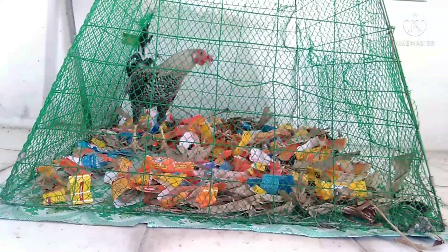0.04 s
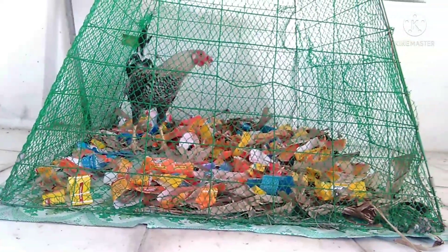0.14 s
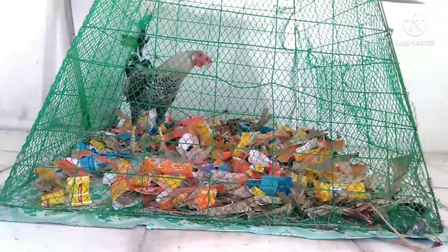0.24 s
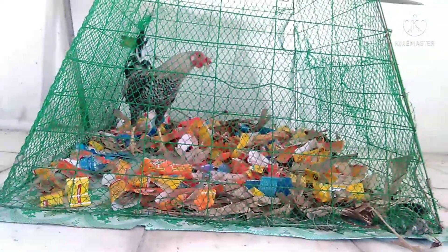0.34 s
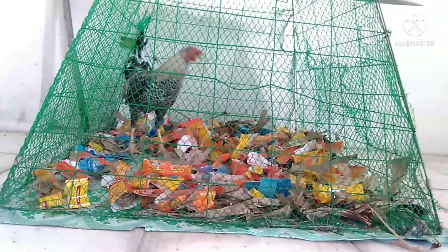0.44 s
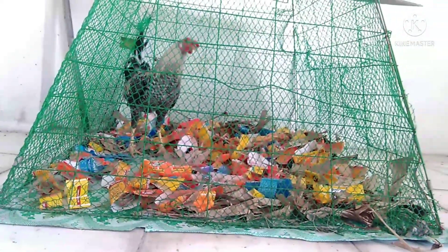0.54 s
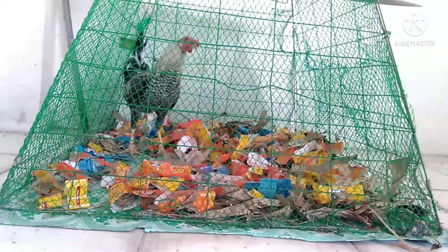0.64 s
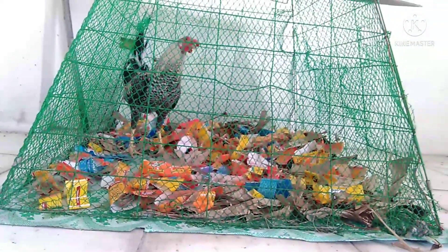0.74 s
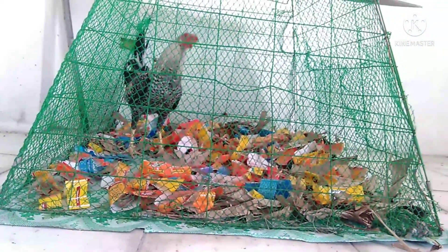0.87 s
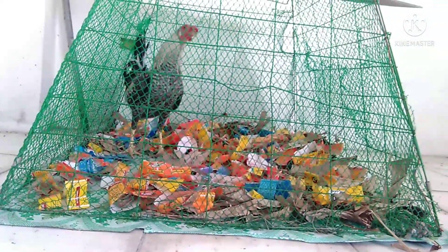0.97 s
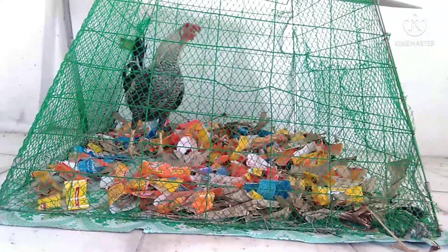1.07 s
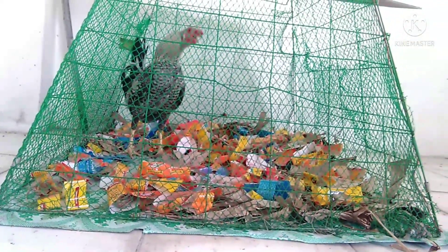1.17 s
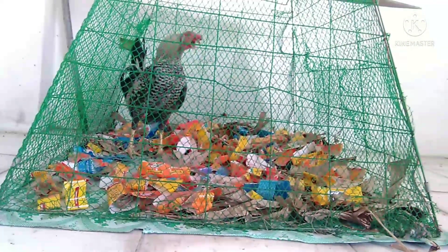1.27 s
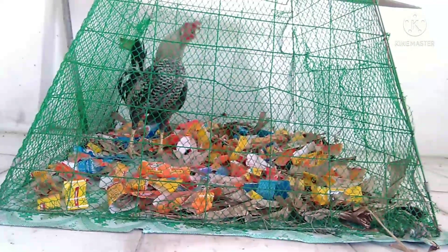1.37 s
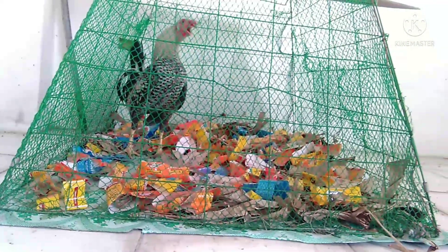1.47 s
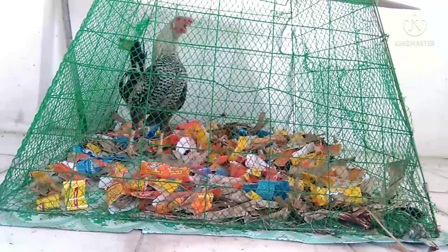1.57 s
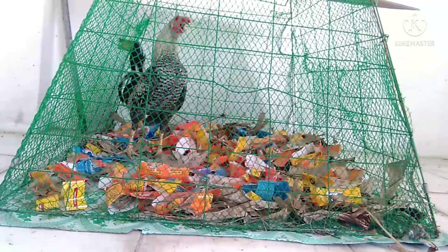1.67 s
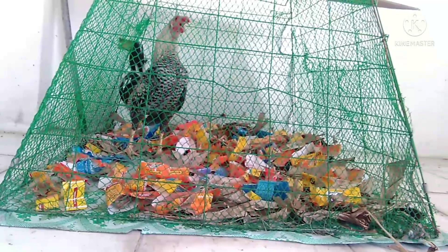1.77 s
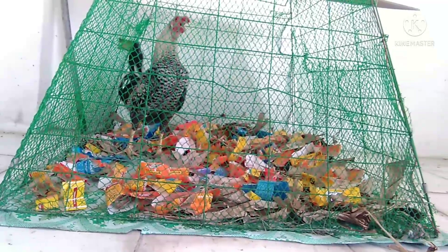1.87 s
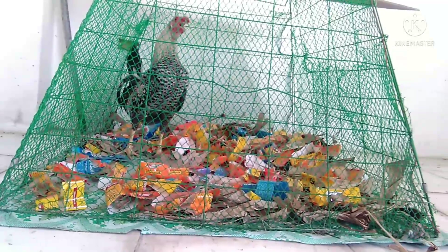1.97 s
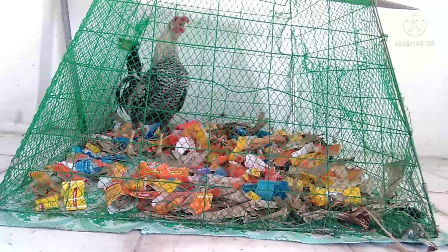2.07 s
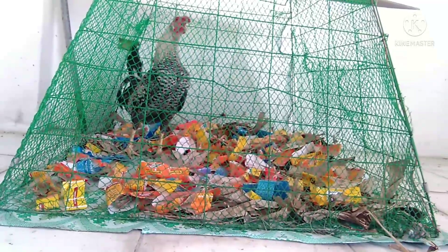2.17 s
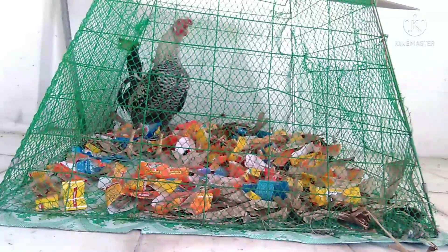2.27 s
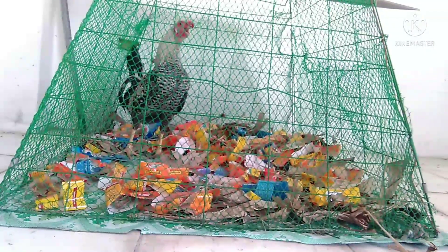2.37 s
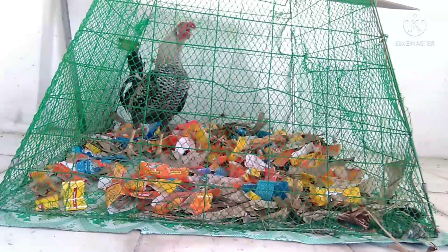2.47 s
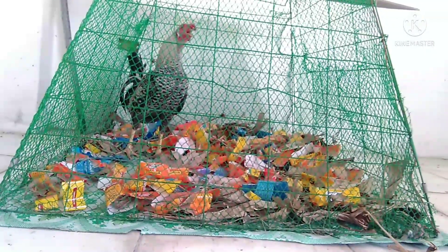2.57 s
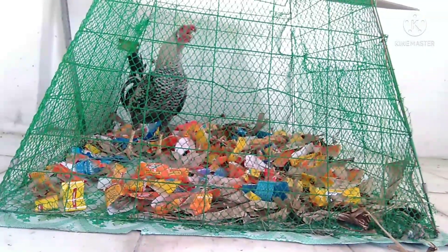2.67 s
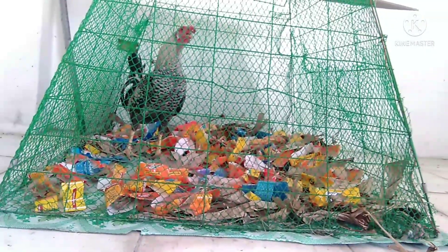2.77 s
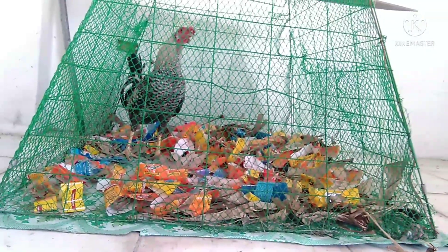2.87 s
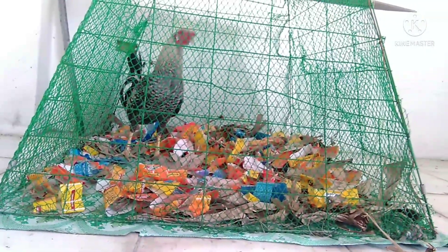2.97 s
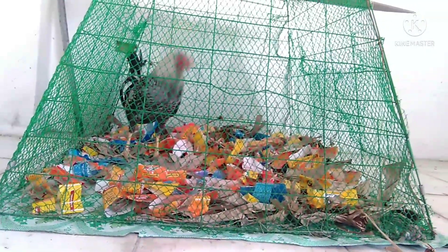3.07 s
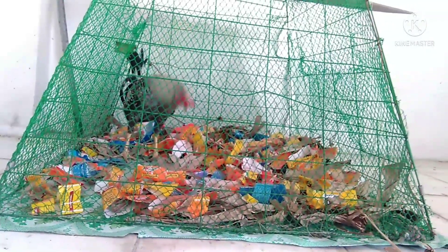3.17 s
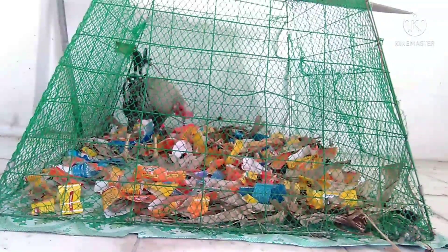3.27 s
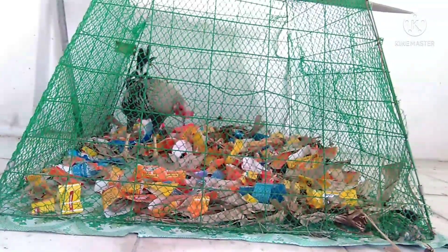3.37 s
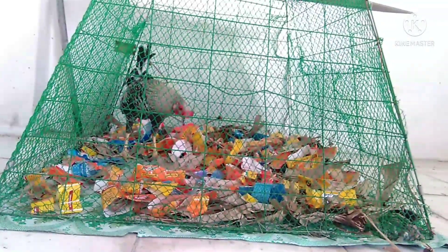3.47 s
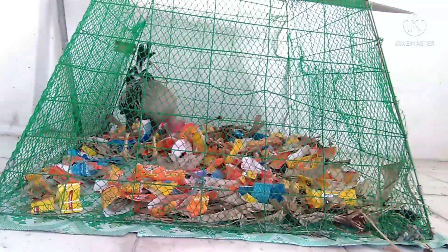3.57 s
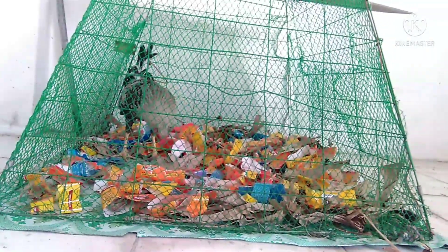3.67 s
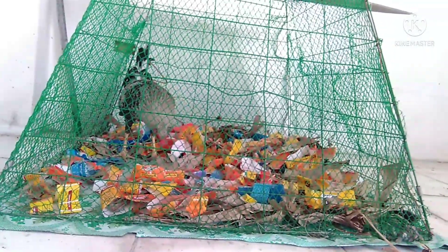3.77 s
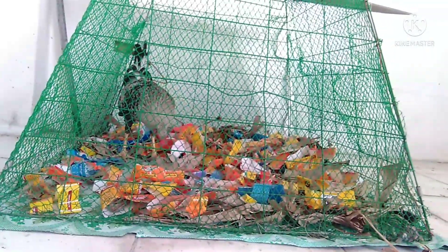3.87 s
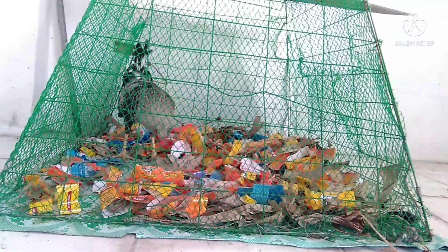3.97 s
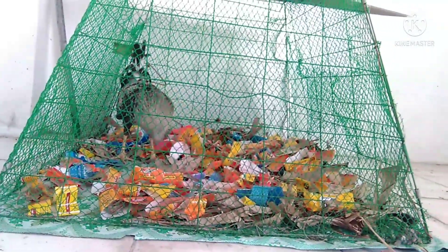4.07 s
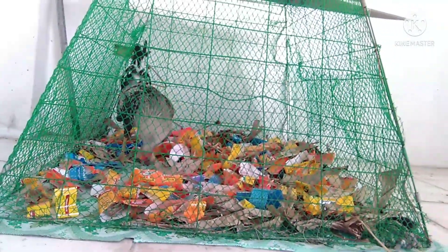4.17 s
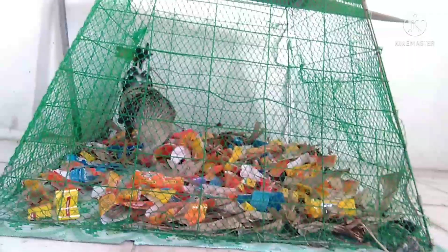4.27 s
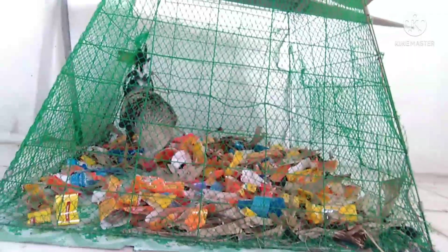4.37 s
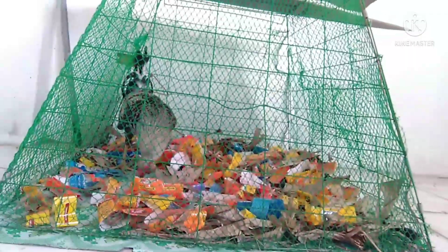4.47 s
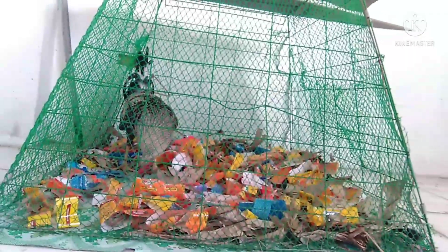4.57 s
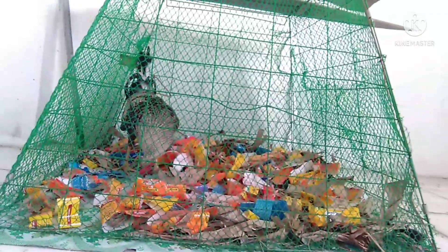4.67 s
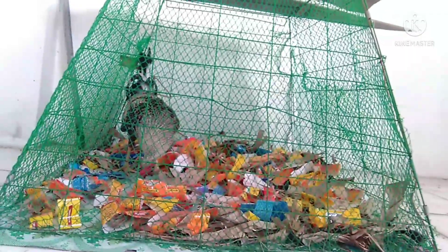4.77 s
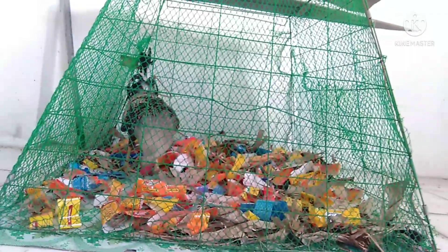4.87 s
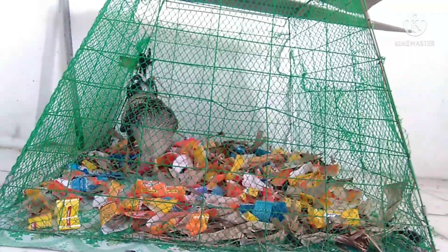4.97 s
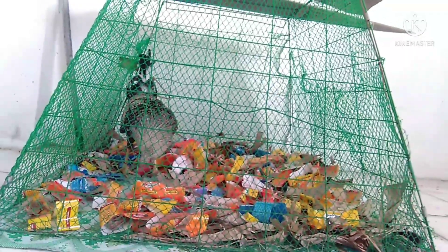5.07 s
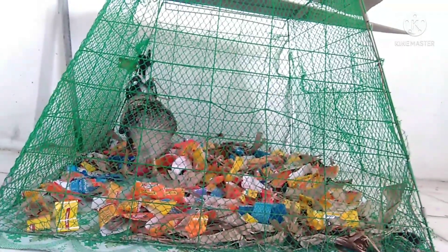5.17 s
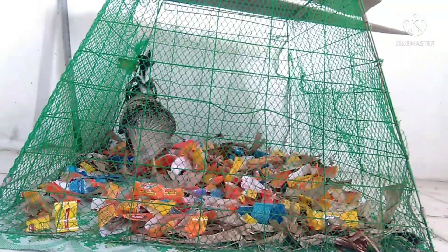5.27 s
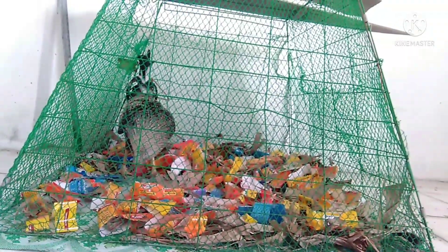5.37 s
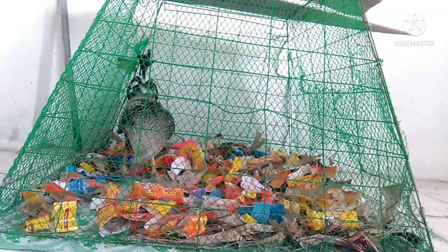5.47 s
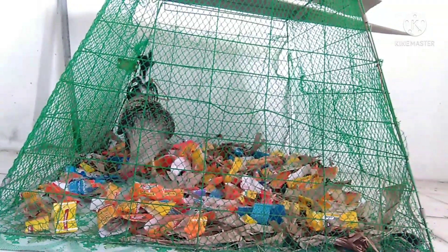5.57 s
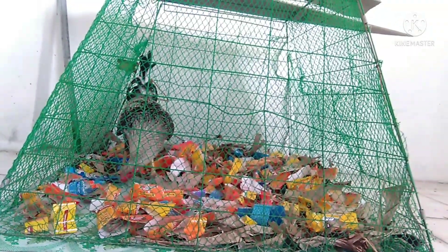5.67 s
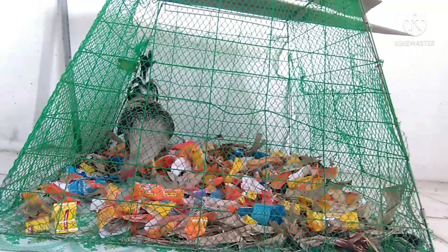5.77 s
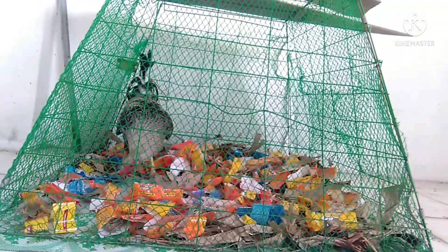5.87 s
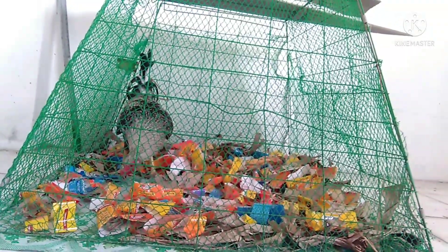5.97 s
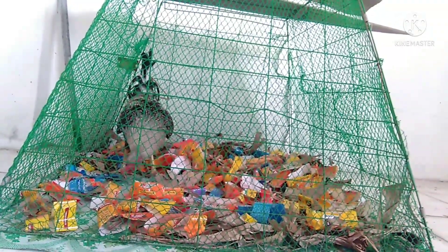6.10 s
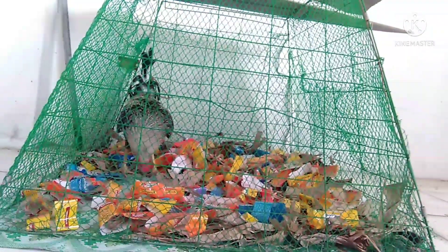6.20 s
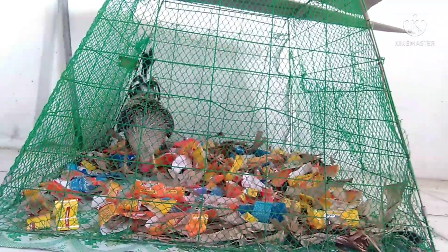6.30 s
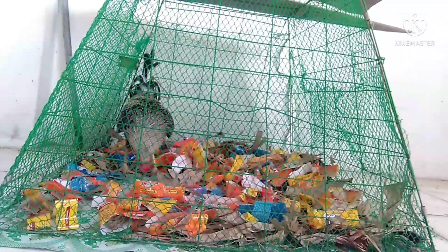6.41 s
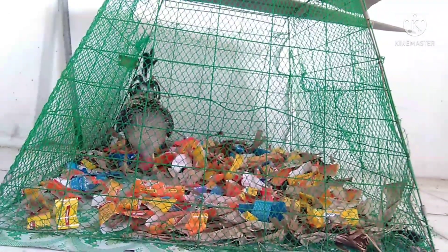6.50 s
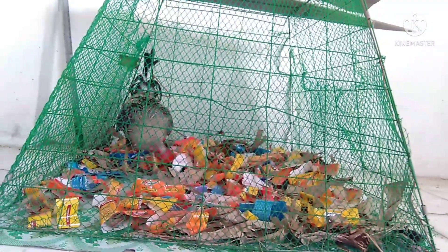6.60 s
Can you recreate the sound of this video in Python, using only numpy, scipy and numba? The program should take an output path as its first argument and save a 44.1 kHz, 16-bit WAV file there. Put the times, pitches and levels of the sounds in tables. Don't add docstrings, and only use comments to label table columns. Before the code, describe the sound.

One close rooster crow, rough then clear and finally mellow, echoes in a hard-walled yard over steady fan hum, with small plastic snaps afterward.

```python
import sys
import numpy as np
from scipy import signal
from scipy.fft import rfft, irfft
from scipy.io import wavfile
from scipy.ndimage import uniform_filter1d, minimum_filter1d
from numba import njit

SR = 44100
rng = np.random.default_rng(int(sys.argv[2]) if len(sys.argv) > 2 else 0)


def gain_from_decibels(decibels):
    exponent = np.asarray(decibels, float) / 20
    return 10 ** exponent


def transcribe(u):
    v = np.clip(np.atleast_2d(u).T, -1, 1)
    q = np.round(v * 32767).astype(np.int16)
    wavfile.write(sys.argv[1], SR, q)


N = 292912


def on_log(table, hz):
    f, v = np.transpose(table)
    return np.interp(np.log(np.maximum(hz, 1)), np.log(f), v)


def unit(x):
    return x / np.sqrt(np.mean(x ** 2))


def colour(x, table):
    hz = np.fft.rfftfreq(x.shape[-1], 1 / SR)
    shut = [(table[0][0] / 1.2, -90)] + list(table) + [(table[-1][0] * 1.2, -90)]
    return irfft(rfft(x) * gain_from_decibels(on_log(shut, hz)), x.shape[-1])


def walk(rate):
    k = int(SR / rate)
    return unit(uniform_filter1d(uniform_filter1d(rng.standard_normal(N), k), k))


@njit
def follow(x, attack, release):
    e, out = 0., np.empty(len(x))
    for i in range(len(x)):
        e += (x[i] - e) * (attack if x[i] > e else release)
        out[i] = e
    return out


def drone(table, db, alike, flicker_db):
    port_lag = 16
    near, other = unit(colour(rng.standard_normal((2, N)), table))
    left = alike * np.roll(near, port_lag) + np.sqrt(1 - alike ** 2) * other
    return np.array([left, near]) * gain_from_decibels(db + flicker_db * walk(4.9))


def hum(air_db):
    # frequency in Hz, level in dB per Hz.
    hum_spectrum = [(15, -63), (25, -55), (32, -46), (47, -22.5), (85, -6), (129, -1), (148, -3),
                    (225, -14), (256, -10), (288, -18), (320, -13), (420, -27), (700, -120)]
    return drone(hum_spectrum, -37 + air_db, 1.0, 1.0)


def flow(air_db, treble_db):
    # frequency in Hz, level in dB per Hz.
    flow_spectrum = [(180, -46), (300, -29), (333, 1), (437, -4.5), (479, -3.5), (611, -3.5), (662, -0.5),
                     (884, -6.5), (1120, -4), (1260, -7.5), (1450, -9.5), (1880, -37), (3190, -120)]
    return drone(flow_spectrum, -42 + 0.42 * air_db + 0.12 * treble_db, 0.6, 1.0)


def rush(air_db, treble_db):
    # frequency in Hz, level in dB per Hz.
    rush_spectrum = [(820, 1), (1400, 2), (1570, 2), (2400, 3), (2630, -2.5), (3130, -10.5), (3600, -21),
                     (4680, -11), (7920, -120)]
    return drone(rush_spectrum, -48 + air_db + 0.46 * treble_db, 0.093, 1.0)


def duct(air_db, treble_db):
    # frequency in Hz, bandwidth in Hz, level in dB.
    modes = [
        (1111, 80, 1.5),
        (2370, 120, -8),
        (3210, 150, -11),
    ]
    t = np.arange(N) / SR
    out = 0
    for hz, width, peak_db in modes:
        k = max(int(SR / width / 2), 1)
        noise = rng.standard_normal((2, 2, N))
        slow = unit(uniform_filter1d(uniform_filter1d(noise, k), k))
        phase = 2 * np.pi * np.cumsum(hz * (1 + 0.015 * walk(1.2))) / SR
        band = slow[0] * np.cos(phase) + slow[1] * np.sin(phase)
        out = out + band * gain_from_decibels(peak_db + 1.2 * walk(4.5))
    return out * gain_from_decibels(-53.5 + 1.53 * air_db + 0.46 * treble_db)


def hiss(treble_db):
    # frequency in Hz, level in dB per Hz.
    hiss_spectrum = [(2060, -2), (3500, 1), (3930, -4.5), (4700, -6.5), (5340, -8.5), (7970, -10),
                     (9110, -9.5), (12700, -22.5), (14000, -25)]
    return drone(hiss_spectrum, -51 + treble_db, 0.066, 0.61)


def ventilation():
    # time in seconds, background level in dB, treble let through by the phone in
    # dB.
    air = [(0, -2, 1.5), (.33, -0.5, -5), (.45, 0, -17), (.83, -2, -14), (1.0, -1.5, -7.5),
           (1.36, -1, -5.5), (2.9, -0.5, 3), (3.4, 2, 2), (3.8, -0.5, 3.5), (4.2, 2, 4.5), (4.6, 3.5, 4.5),
           (5.0, 2.5, 6), (5.3, 4, 5.5), (5.7, 3.5, 6), (5.95, 5, 7.5), (6.25, 3, 6.5), (6.64, 3.5, 8.5)]
    t = np.arange(N) / SR
    s, *columns = np.transpose(air)
    air_db, treble_db = (np.interp(t, s, c) for c in columns)
    low = hum(air_db) + flow(air_db, treble_db)
    high = rush(air_db, treble_db) + hiss(treble_db)
    return low + high + duct(air_db, treble_db)


def phrase(t):
    # start in seconds, pitch at start in Hz,
    # pitch at end in Hz, effort in dB, first partial in dB.
    notes_sung = [(1.39, 984.4, 974.4, -11.5, -7.5), (1.492, 875.8, 840.4, -12, -9.5),
                  (1.55, 674, 694.8, -13.5, -30), (1.58, 777, 771, -25.5, 2),
                  (1.645, 867.7, 863, -26.5, 3.5), (1.698, 913.3, 992.9, -13.5, -5.5),
                  (1.738, 1004, 1049, -18, 6.5), (1.766, 1053, 1050, -24, 13),
                  (1.823, 934.3, 933, -13.5, 3.5), (1.843, 698, 645, -17, -22),
                  (1.892, 647.8, 733, -14, -17.5), (1.928, 905.5, 984.5, -13, -2),
                  (2.02, 936, 1000, -14.5, 0), (2.08, 987, 1014, -15.5, 7.5), (2.14, 934.7, 907, -14, -3.5),
                  (2.3, 906.5, 892.4, -12, 2), (2.425, 669.3, 653.7, -16.5, -18),
                  (2.511, 657, 662.7, -7.5, -22), (2.56, 667, 741, -9.5, -12),
                  (2.602, 838.7, 836.2, -8, -20), (2.699, 843.6, 827.6, -7.5, -15),
                  (2.8, 824.5, 813.6, -12, -13), (2.86, 813.4, 783.7, -16.5, 4),
                  (2.914, 785.7, 723, -25.5, 15)]
    crow_end_s, attack_s, release_s = 2.965, 0.01, 0.019
    slur_samples = int(0.0027 * SR) + 1
    start, hz0, hz1, db, first_db = np.transpose(notes_sung)
    end = np.append(start[1:], crow_end_s)
    k = np.clip(np.searchsorted(start, t) - 1, 0, None)
    progress = np.clip((t - start[k]) / (end - start)[k], 0, 1)
    hz = hz0[k] + (hz1 - hz0)[k] * progress
    edge = np.clip(np.minimum((t - start[0]) / attack_s, (crow_end_s - t) / release_s), 0, 1)
    effort_db = uniform_filter1d(db[k], slur_samples) - 9 * (1 - edge)
    first_db = uniform_filter1d(first_db[k], slur_samples)
    return hz, effort_db, first_db, (t > start[0]) & (t < crow_end_s)


def crack(t, hz, first_db):
    # middle in seconds, length in seconds.
    cracks = [
        (2.006, .018),
        (2.056, .012),
        (2.112, .016),
        (2.15, .012),
        (2.204, .012),
        (2.238, .018),
        (2.322, .016),
        (2.362, .01),
    ]
    drop_ratio, rebound, rebound_s = 0.76, 0.037, 0.023
    for start, length in cracks:
        after = t - start - length / 2
        first_db = first_db - 25.5 * (abs(t - start) < length)
        sharp = 1 + (after > 0) * rebound * np.exp(-abs(after) / rebound_s)
        hz = hz * np.where(abs(t - start) < length / 2, drop_ratio, sharp)
    return hz, first_db


def membrane(turns, first_db, bright_db, rough, beat):
    voice = 0
    for k in range(1, 20):
        steady = 1 if k < 5 else np.clip(1 - 4 * rough, .25, 1)
        partial_db = first_db if k == 1 else bright_db * (k > 2) - 7 * (k == 3)
        voice = voice + steady * gain_from_decibels(partial_db) * np.cos(2 * np.pi * k * turns + 0.28 * k ** 2)
    fourth = np.minimum(3 * rough, 1) * np.cos(np.pi * turns / 2)
    pattern = fourth + 1.16 * np.cos(np.pi * turns)
    voice = voice * (1 + 0.58 * beat * pattern)
    return voice * gain_from_decibels(5 * rough * walk(300))


def rasping_air(turns, bright_db, rough):
    # frequency in Hz, level in dB per Hz.
    rasp_spectrum = [(700, -20.5), (1500, -15), (3000, -7.5), (6000, -14.5), (14000, -4.5)]
    gate = np.exp(-(turns % 1) / 0.4)
    rasp = unit(colour(gate * rng.standard_normal(N), rasp_spectrum))
    return rasp * (0.0061 + rough) * gain_from_decibels(16.5 + bright_db)


def throat(source, t):
    # frequency in Hz, gain in dB.
    bent = [(300, -38), (750, 5), (1000, 0.5), (1200, -9), (1750, 7), (2000, -5), (2400, -14),
            (3300, -25.5), (3850, -36.5), (4450, -17), (5800, -7), (7200, -18), (9000, -23), (14000, -31)]
    # frequency in Hz, gain in dB.
    straight = [(300, -11), (700, 3.5), (1400, -4), (1900, 7.5), (2500, -11), (3650, -9), (4080, -27),
                (4500, -18), (5800, -10), (6500, -13), (7500, -13), (8600, -18), (10300, -21), (14000, -32)]
    stretch_s = 1.70
    stretched = np.clip((t - stretch_s) / .02 + .5, 0, 1)
    return colour(source * (1 - stretched), bent) + colour(source * stretched, straight)


def rooster():
    # time in seconds, brightness in dB, roughness from 0 to 1,
    # subharmonic beat from 0 to 1.
    voice_course = [
        (1.388, 4, .33, .95),
        (1.639, 3, 0.33, 0.53),
        (1.758, 8, .17, .1),
        (1.9, 4, .1, .03),
        (2.132, 5.5, .14, .08),
        (2.4, 6.5, 0.18, 0.05),
        (2.55, -12.5, 0.07, 0.11),
        (2.86, -5.5, 0, 0.01),
        (2.929, -5.5, 0.16, 0),
    ]
    t = np.arange(N) / SR
    hz, effort_db, first_db, sounding = phrase(t)
    s, *columns = np.transpose(voice_course)
    bright_db, rough, beat = (np.interp(t, s, c) for c in columns)
    hz, first_db = crack(t, hz, first_db)
    shake = .02 * walk(500) + .025 * walk(60)
    turns = np.cumsum(uniform_filter1d(hz, 90) * (1 + rough * shake)) / SR
    voice = membrane(turns, first_db, bright_db, rough, beat)
    source = voice + rasping_air(turns, bright_db, rough)
    return throat(source * gain_from_decibels(effort_db) * sounding, t)


def yard():
    # frequency in Hz, time to fall 60 dB in seconds.
    t60 = [(600, 1.58), (1000, 1.62), (2000, 1.26), (4000, 1.19), (8000, 0.92), (14000, 1.1)]
    build_s, level_db = 0.0051, 6.5
    size = 2 * SR
    t = np.arange(size) / SR
    hz = np.fft.rfftfreq(size, 1 / SR)
    noise = rfft(rng.standard_normal((2, size)))
    tail = 0
    for centre in 350 * 2 ** np.arange(0, 5.6, .5):
        share = np.clip(1 - 2 * abs(np.log2(np.maximum(hz, 1) / centre)), 0, 1)
        tail = tail + irfft(noise * share, size) * gain_from_decibels(-60 * t / on_log(t60, centre))
    tail = tail * (1 - np.exp(-(t / build_s) ** 2))
    return tail * gain_from_decibels(level_db) / np.sqrt(np.mean(np.sum(tail ** 2, axis=1)) * 3)


def crow():
    pan_db, lag = 7, 4
    bird = rooster()
    direct = np.array([bird * gain_from_decibels(pan_db / 2), np.roll(bird, lag) * gain_from_decibels(-pan_db / 2)])
    echoes = signal.fftconvolve(bird[None], yard(), axes=1)[:, :N]
    return direct + echoes


def litter():
    # time in seconds, peak in dB.
    ticks = [
        (3.4131, -33),
        (3.697, -32),
        (3.8045, -39),
    ]
    # frequency in Hz, level in dB per Hz.
    litter_spectrum = [(3500, -9.5), (7000, 5), (10000, -3.5), (13500, 0)]
    start_s, end_s, rate, level_db = 2.7, 3.9, 220, -54.5
    t = np.arange(N) / SR
    hit, size = rng.random((2, N))
    stepping = (t > start_s) & (t < end_s)
    clicks = (hit < rate / SR) * gain_from_decibels(level_db - 4.0 * np.log(size + 1e-9)) * stepping
    for s, db in ticks:
        clicks[int(s * SR)] = gain_from_decibels(db - 2.5)
    snap = rng.standard_normal((2, 300)) * np.exp(-np.arange(300) / (0.0013 * SR))
    return colour(signal.fftconvolve(clicks[None], snap, axes=1)[:, :N], litter_spectrum)


def scene():
    return ventilation() + crow() + litter()


def limit(x):
    peak = -minimum_filter1d(-abs(x).max(axis=0), size=90)
    loud = follow(peak, 1 / (.0007 * SR), 1 / (.025 * SR))
    return x * np.minimum(1, 1 / (loud + 1e-9))


def thin_treble(x):
    window = np.sqrt(signal.get_window("hann", 2048))
    hz, _, z = signal.stft(x, SR, window, 2048)
    db = 10 * np.log10(np.mean(abs(z) ** 2, axis=0) + 1e-16)
    around_db = uniform_filter1d(db, size=120, axis=0)
    top_db = db.max(axis=0)
    load = np.clip((top_db + 40) / 22, 0, 1)
    strain_db = 9.5 * load + 7 * np.clip(hz / 4000 - 2.25, 0, 1)[:, None]
    quiet = np.clip((-82 - around_db) / 7, 0, 1)
    dealt = uniform_filter1d(rng.standard_normal((65, z.shape[2])), size=5, axis=1) * np.sqrt(5)
    dealt = np.repeat(dealt, 16, axis=0)[:len(hz)]
    scatter_db = 5.5 * (.5 + np.maximum(load, quiet) / 2) * dealt
    threshold_db = around_db - 9 + np.maximum(strain_db, 10 * quiet) + scatter_db
    attack = np.diff(top_db, prepend=0) > 12
    keep = (db > threshold_db) | (hz < 3000)[:, None] | attack
    return signal.istft(z * keep, SR, window, 2048)[1][:, :N]


def top_cut(x):
    return signal.sosfilt(signal.butter(12, 14130, fs=SR, output="sos"), x)


def record(dry):
    clipped = np.clip(limit(dry) * gain_from_decibels(1.95), -1, 1)
    mix = np.clip(thin_treble(clipped), -1, 1)
    return top_cut(mix)


dry = scene()
out = record(dry)
transcribe(out)
```